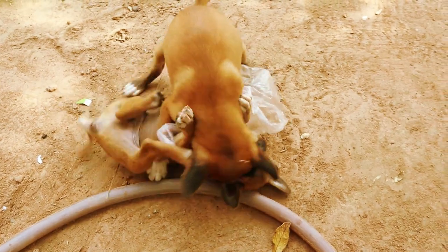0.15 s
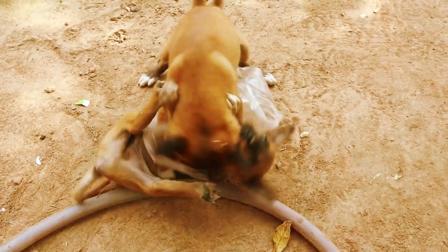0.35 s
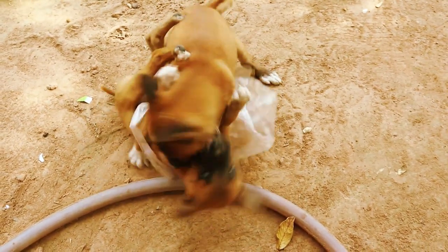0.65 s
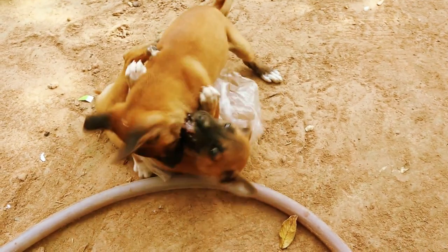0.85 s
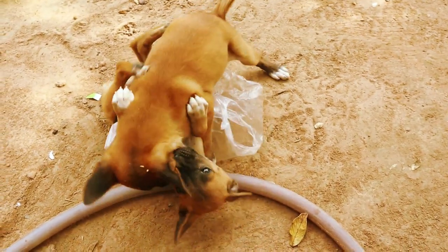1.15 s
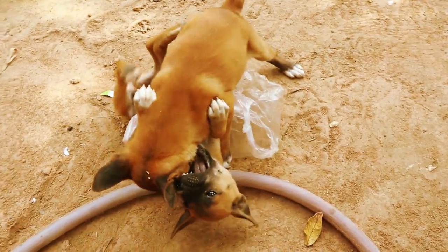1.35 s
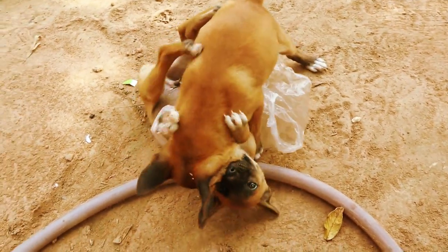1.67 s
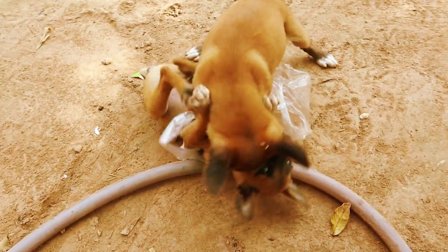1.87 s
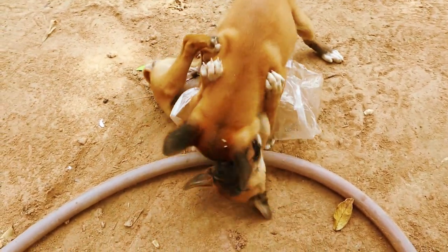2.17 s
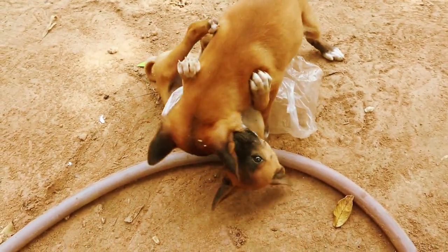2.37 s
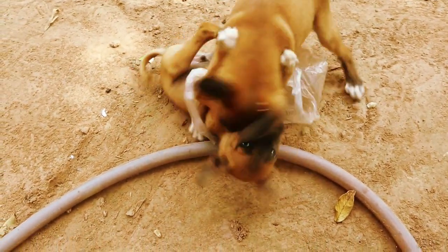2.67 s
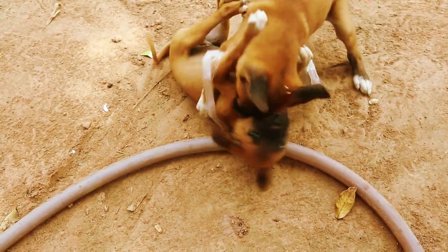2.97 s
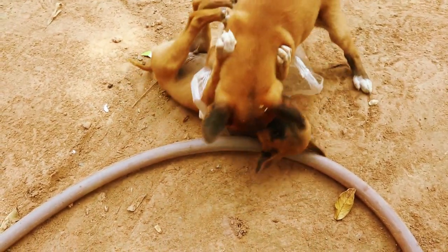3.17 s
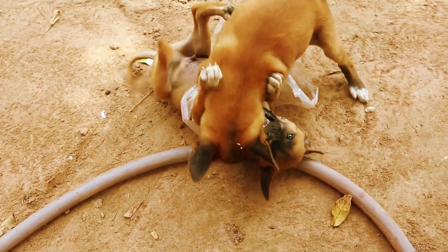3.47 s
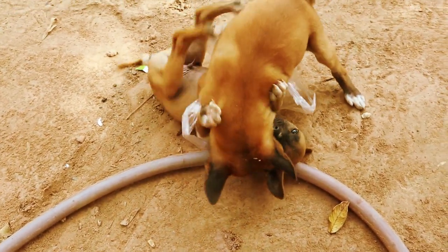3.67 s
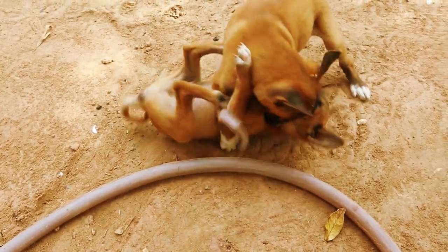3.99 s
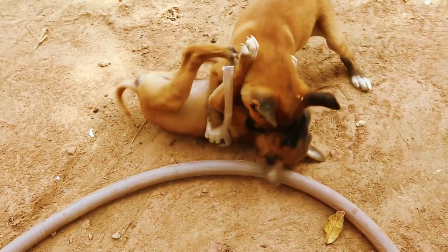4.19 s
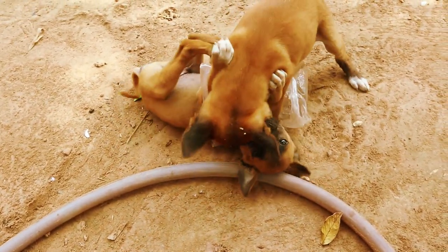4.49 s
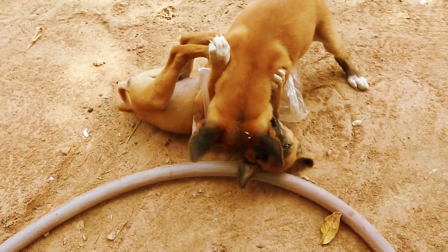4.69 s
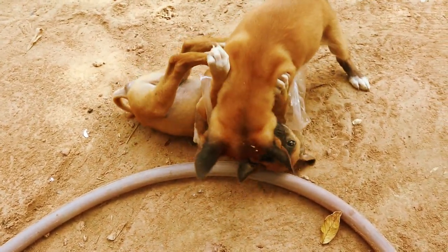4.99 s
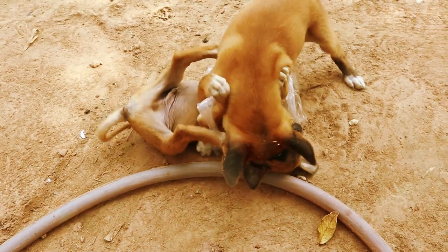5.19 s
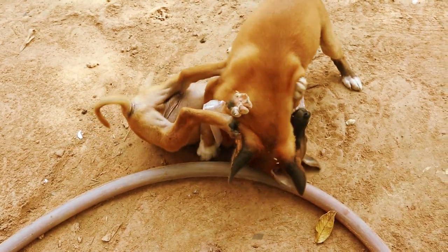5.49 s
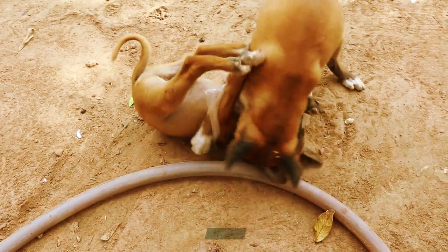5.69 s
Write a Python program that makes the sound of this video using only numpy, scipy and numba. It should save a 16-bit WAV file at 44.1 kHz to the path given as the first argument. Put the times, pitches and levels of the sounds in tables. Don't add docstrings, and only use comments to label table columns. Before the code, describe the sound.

Outdoors on bare dirt, two puppies wrestle at arm's length from a stereo microphone. From 0 to 0.7 s a loud, high-pitched scuffle of snarls and quick yaps bursts out, rough and nasal. Short low growls and a grunt follow around 0.8-1.4 s. From 1.5 s a longer growl flutters, breaking into sharp yelps at about 2.1-2.3 s, then sinking to a low, croaky rattle until 3.4 s. After a small gap, a pulsing growl at 3.7 s stutters rapidly and peaks in a piercing yelp near 4.3 s. More growling with small yelps runs 4.6-5.1 s; a final excited snarl starts at 5.4 s and continues to the end. Beneath, paws scuff grit and thin plastic crackles and ticks. Faint chicks peep intermittently, a distant horn sounds at 1.2-1.5 s with fainter tones later, over soft village rumble, low engine hum and slight wind.

```python
import sys
import numpy as np
from scipy import signal
from scipy.fft import rfft, irfft
from scipy.io import wavfile
from scipy.ndimage import uniform_filter1d
from numba import njit

SR = 44100
rng = np.random.default_rng(int(sys.argv[2]) if len(sys.argv) > 2 else 0)


def volts(x):
    e = np.asarray(x, float) / 20
    return 10 ** e


def store_pcm(level_fs):
    pcm = np.round(np.clip(level_fs, -1, 1) * 32767).astype(np.int16)
    wavfile.write(sys.argv[1], SR, np.atleast_2d(pcm).T)


N = 257984

# t/s, chest level/dB, pulse rate f/Hz, roughness/1
PUSHES = [(0, -22, 227.8, 0.63), (0.212, -13.5, 313.6, .3), (0.298, -21, 265, 0.4), (0.44, -16, 224.8, .4),
          (0.51, -25.5, 258.9, .3), (0.571, -21.5, 317.3, 0.25), (0.67, -20.5, 259.9, .35),
          (0.801, -31, 131.5, .6), (0.922, -26.5, 146.4, .6), (1.028, -30, 147.7, 0.5),
          (1.198, -23.5, 273.9, .5), (1.301, -28, 259.8, 0.4), (1.437, -23.5, 141, .5),
          (1.62, -24, 192.3, 0.8), (1.968, -26.5, 186.8, 0.5), (2.069, -18, 184.5, .15),
          (2.116, -24, 220.9, 0.2), (2.199, -29, 262.8, 0.4), (2.299, -30, 245.7, 0.25),
          (2.387, -36, 229, .1), (2.459, -33, 149.8, .6), (2.62, -31.5, 132.2, .3),
          (2.888, -30, 169.4, .45), (3.039, -38.5, 257.5, 0.1), (3.125, -27.5, 206.9, 0.5),
          (3.27, -28, 180, 0.7), (3.35, -30, 150.2, 0.7), (3.601, -27, 213.2, .4),
          (3.743, -21.5, 238.9, .4), (4.04, -23, 193.3, 0.5), (4.252, -22, 208.9, 0.2),
          (4.309, -22.5, 257, 0.4), (4.38, -25.5, 278.5, .15), (4.417, -37, 182.2, .08),
          (4.519, -34, 139.6, .6), (4.711, -29, 269.3, .5), (4.901, -27.5, 275.3, 0.3),
          (4.972, -29.5, 245.4, .35), (5.052, -28, 210.9, 0.4), (5.298, -29, 101.5, .15),
          (5.509, -25.5, 251.2, 0.3), (5.551, -22, 285.9, 0.2), (5.59, -25, 238.4, 0.3),
          (5.651, -25.5, 257.9, 0.3), (5.7, -23.5, 231.5, 0.3), (5.76, -27, 209.2, .3),
          (5.81, -17, 241.4, 0.3)]
# start t/s, end t/s
BREATHS = [
    (0, .738),
    (.835, 1.022),
    (1.037, 1.078),
    (1.1, 1.378),
    (1.483, 2.452),
    (2.477, 3.375),
    (3.66, 4.45),
    (4.585, 5.12),
    (5.41, 6.2),
]
# t/s, depth of catch level/dB
CATCHES = [(.154, 0), (.245, 7), (.327, 7.5), (0.588, 10), (.93, -2.5), (1.135, 3), (1.198, 9),
           (1.326, -2.5), (1.732, -5.5), (2.005, 11.5), (2.039, 9.5), (2.09, 7.5), (2.122, 1),
           (2.192, -0.5), (2.211, 0), (2.323, 0.5), (2.68, 1.5), (2.74, 5), (2.95, 2), (2.989, 7),
           (3.025, 7), (3.247, 1), (3.34, -7), (4.258, -4.5), (4.278, 4.5), (4.315, -6.5), (4.356, 11),
           (4.698, 5), (4.794, 1), (4.91, -2), (5.435, 5.5), (5.501, -2), (5.562, -6), (5.643, 5.5)]
# first t/s, last t/s, gap t/s, depth level/dB
FLUTTERS = [
    (1.513, 1.63, .037, 1.5),
    (3.691, 4.0, .0416, 12.5),
]
# f/Hz, width f/Hz, level over the bare pulse/dB
CHEST_MODES = [(265, 330, 5), (523, 61, 8.5), (698, 79, 17)]
# f/Hz, width f/Hz, level/dB
UPPER_MODES = [(2770, 200, -17), (3750, 200, -13), (4500, 360, -23.5)]
# start t/s, end t/s, mouth level/dB, first mouth resonance f/Hz, last f/Hz
YELPS = [(0, 0.074, -20, 1630, 1473), (0.084, 0.225, -28, 1301, 1116), (0.237, 0.296, -22.5, 1262, 1445),
         (0.33, 0.442, -29, 1414, 1042), (0.463, 0.558, -16.5, 1087, 1595), (0.568, 0.603, -20, 1626, 1710),
         (0.679, 0.727, -35, 1123, 1624), (0.851, 0.961, -41, 1306, 1290),
         (1.047, 1.057, -20.5, 1794, 1630), (1.053, 1.077, -30, 1342, 1335), (1.14, 1.144, -19, 1260, 1300),
         (1.49, 1.636, -35.5, 1270, 1400), (1.615, 1.854, -36, 1520, 1370), (1.876, 1.917, -44, 1360, 1195),
         (2.099, 2.103, -8.5, 1170, 1170), (2.12, 2.141, -9.5, 1200, 1346),
         (2.135, 2.296, -12.5, 1470, 1651), (2.314, 2.382, -20.5, 1600, 1654),
         (2.48, 2.906, -42.5, 1400, 1200), (2.901, 2.928, -20, 1115, 1239), (2.938, 3.04, -19, 1268, 1488),
         (3.176, 3.386, -52, 1227, 1523), (3.7, 4.026, -42, 1114, 1260), (4.123, 4.26, -55, 1500, 1400),
         (4.254, 4.334, -15, 1220, 1663), (4.331, 4.356, -2.5, 1550, 1707),
         (4.359, 4.429, -16.5, 1560, 1646), (4.746, 4.875, -24.5, 1406, 1625),
         (4.85, 4.901, -19.5, 1490, 1587), (4.908, 4.941, -14, 1650, 1660), (4.964, 4.986, -23, 1654, 1657),
         (5.056, 5.097, -51.5, 1580, 1576), (5.432, 5.493, -48, 1477, 1490), (5.51, 5.621, -16, 1520, 1762),
         (5.58, 5.726, -21, 1595, 1540), (5.748, 5.976, -29.5, 1400, 1314)]
# start t/s, end t/s, level/dB
RASPS = [(0, .04, -27.5), (.715, .745, -21), (1.037, 1.072, -33.5), (1.135, 1.162, -45),
         (1.355, 1.39, -34.5), (2.68, 2.72, -44.5), (3.17, 3.2, -41.5), (3.31, 3.41, -47),
         (3.43, 3.57, -51), (2.215, 2.29, -22.5), (4.91, 4.96, -28), (5.55, 5.6, -33), (4.08, 4.2, -57.5),
         (5.125, 5.14, -46.5)]
# start t/s, end t/s, level/dB
SCUFFS = [(0, .03, -48.5), (.1, .3, -59), (.35, .54, -52.5), (.69, .73, -48.5), (.785, .81, -51.5),
          (.91, 1.12, -55), (1.2, 1.3, -62), (1.345, 1.42, -58), (1.5, 1.56, -66.5), (1.6, 1.87, -63.5),
          (1.878, 1.93, -54.5), (1.95, 2.07, -55), (2.088, 2.13, -53), (2.56, 2.88, -66.5),
          (2.9, 3.08, -57), (3.1, 3.15, -65.5), (3.29, 3.38, -60.5), (3.45, 3.6, -67.5), (3.62, 3.66, -66),
          (3.748, 3.77, -53.5), (3.79, 3.93, -58.5), (3.94, 4.14, -53), (4.16, 4.35, -55.5),
          (4.72, 4.98, -64.5), (5.135, 5.195, -64.5), (5.36, 5.47, -69), (5.5, 5.75, -55.5),
          (5.77, 5.9, -55.5)]
# f/Hz, level per Hz/dB
RUSTLE_COLOUR = [(200, -19), (700, 8.5), (2000, -2), (3500, -0.5), (5000, -7), (7500, -15.5),
                 (11000, -24.5), (15500, -36.5)]
# t/s, peak level/dB
SNAPS = [(0.1007, -43.5), (0.2151, -32.5), (1.2057, -35.5), (1.521, -44.5), (1.8826, -33), (1.9989, -38),
         (2.0896, -25.5), (2.2248, -34), (2.3196, -43), (2.3673, -39), (2.5546, -53), (2.697, -56),
         (2.909, -32.5), (3.3009, -49), (3.6262, -40), (3.7483, -34.5), (4.6593, -55.5), (4.811, -35),
         (4.8793, -34.5), (4.9083, -30.5), (5.1292, -59), (5.3717, -60.5), (5.4715, -53.5), (5.502, -31.5),
         (5.643, -43)]
# t/s, first f/Hz, top f/Hz, last f/Hz, level/dB
PEEPS = [
    (1.917, 4000, 5700, 3900, -54),
    (1.985, 3700, 5100, 4400, -45),
    (3.005, 3900, 4800, 5200, -49),
    (3.615, 4700, 6200, 6600, -61),
    (3.685, 1900, 2550, 2500, -46),
    (4.643, 3800, 6200, 5200, -64),
    (4.69, 3900, 3950, 3900, -56),
    (.13, 4500, 4400, 4300, -49),
    (1.045, 3700, 4900, 4900, -51),
    (1.408, 3950, 4000, 3950, -56),
]
# start t/s, end t/s, f/Hz, level/dB
HORN = [
    (1.159, 1.5, 1474, -42),
    (1.139, 1.5, 735, -55),
    (3.424, 3.55, 705, -56),
    (3.544, 3.68, 1156, -56),
    (5.185, 5.3, 685, -59),
]
# f/Hz, level per Hz/dB
VILLAGE = [(60, -45.5), (120, -3), (400, -17), (720, -15.5), (1000, -14.5), (2000, -21), (3800, -29),
           (8000, -73)]
# start t/s, end t/s, level/dB
GUSTS = [
    (3.58, 3.7, -44.5),
    (3.8, 4.3, -57.5),
    (4.85, 4.95, -56.5),
]
# f/Hz, phase/rad
PORT_PHASE = [(40, 0.99), (430, -0.77), (1210, -0.81), (2150, -0.69), (2930, -0.73), (3530, 0.44)]
# f/Hz, level/dB
PORT_BALANCE = [(60, -2.5), (94, -2), (150, 5), (230, 2.5), (360, 2.5), (560, 1), (880, 2), (1370, 1),
                (2150, 0.5), (3360, 5)]

PITCH_GLIDE_S, LEVEL_GLIDE_S, PITCH_WANDER = .04, .04, .04
BREATH_RISE_S, BREATH_FALL_S, BREATH_ARCH_DB = .008, .018, 3.5
JAW_RISE_S, JAW_FALL_S, JAW_ARCH_DB = 0.02, 0.036, 5
GAPE_EARLY_AT, GAPE_EARLY_SHARE = 0.51, 0.64
SHUT_MOUTH_DB, SHUT_UPPER_DB = -15.5, -26.5
CHEEK_DB, PALATE_DB, PALATE_ABOVE_HZ = -14, -19.5, 916
UPPER_DB, UPPER_DB_PER_OCTAVE, REST_HZ = -19.5, -1, 1400
THROAT_CUT_HZ = 3950
TEETH_HZ, TEETH_WIDTH_HZ, TEETH_DB, TEETH_CUT_HZ = 6900, 1800, -20, 11000
PEAK_AT = 0.36
SCUFF_RISE_S, SCUFF_FALL_S, STIRRING_DB = .05, .2, -68
PEEP_S = .045
VILLAGE_LEVEL_DB, ENGINE_DB, BREEZE_DB = -44, -47.5, -59.5
DUCK_ABOVE_DB, DUCK_RATIO, DUCK_RECOVER_DB_S = -15, 2.3, 3


def puppies():
    start, end, db, first_hz, last_hz = np.transpose(YELPS)
    early_s = start + GAPE_EARLY_AT * (end - start)
    early_hz = first_hz + GAPE_EARLY_SHARE * (last_hz - first_hz)
    gape_s = np.ravel([start, early_s, end], "F")
    gape_hz = np.ravel([first_hz, early_hz, last_hz], "F")
    mouth_hz = np.interp(np.arange(N) / SR, gape_s, gape_hz)

    clicks, airy = flutter() * np.array(glottis())
    chest = chest_sound(.7 * clicks + .3 * airy)
    mouth, palate = mouth_sound(airy, mouth_hz)
    upper = upper_throat(airy, mouth_hz)

    breaths = [(a, b, 0) for a, b in BREATHS]
    breath_db = spans_db(breaths, BREATH_RISE_S, BREATH_FALL_S, BREATH_ARCH_DB)
    chest_db = pushes(column=1, glide_s=LEVEL_GLIDE_S) + breath_db
    open_db = spans_db(zip(start, end, db), JAW_RISE_S, JAW_FALL_S, JAW_ARCH_DB)
    gape_rasp_db = open_db + UPPER_DB + UPPER_DB_PER_OCTAVE * np.log2(mouth_hz / REST_HZ)
    rasp_db = np.maximum(gape_rasp_db, spans_db(RASPS, rise_s=0.011, fall_s=0.012, arch_db=0.5))

    growl = volts(chest_db) * (chest + volts(SHUT_MOUTH_DB) * mouth + volts(SHUT_UPPER_DB) * upper)
    yelp = volts(open_db) * (mouth - palate)
    return growl + yelp + volts(rasp_db) * upper


def glottis(jitter=.35, shimmer_db=4.5, breath=.12):
    pitch = pushes(column=2, glide_s=PITCH_GLIDE_S) * np.exp(PITCH_WANDER * drift(6))
    rough = pushes(column=3, glide_s=LEVEL_GLIDE_S)
    restarts_s = np.append(reopenings()[:, 0], np.array(BREATHS)[:, 0])
    reopen = np.append(np.sort(restarts_s) * SR, 2 * N).astype(int)
    clicks, i = np.zeros(N), 0
    for step, strength in rng.standard_normal((3000, 2)):
        period = int(SR / pitch[i] * np.exp(jitter * rough[i] * step))
        restart = reopen[np.searchsorted(reopen, i, side="right")]
        i = restart if restart < i + 1.5 * period else i + period
        if i >= N:
            break
        click_db = shimmer_db * (.15 + rough[i]) * np.clip(strength, -2, 1.5)
        clicks[i] = volts(click_db) / np.sqrt(pitch[i])
    puff = signal.lfilter([1], [1, -np.exp(-1 / (.0025 * SR))], clicks)
    air = breath * (.14 + 1.15 * rough) * puff * rng.standard_normal(N)
    return clicks, clicks + air


def pushes(column, glide_s):
    rows = np.array(PUSHES)
    now = np.searchsorted(rows[1:, 0], np.arange(N) / SR, side="right")
    return uniform_filter1d(rows[now, column], size=int(glide_s * SR), mode="nearest")


def reopenings():
    runs = [(s, db) for first, last, gap, db in FLUTTERS for s in np.arange(first, last, gap)]
    return np.array(sorted(list(map(tuple, CATCHES)) + runs))


def flutter(shut_s=0.0067, before_s=.012):
    t, dip_db = np.arange(N) / SR, np.zeros(N)
    for s, depth_db in reopenings():
        near = slice(max(int((s - .04) * SR), 0), int((s + .02) * SR))
        dip_db[near] -= depth_db * np.exp(-((t[near] - s + before_s) / shut_s) ** 2)
    return volts(dip_db + 3)


def chest_sound(clicks, open_s=0.0022):
    push = signal.lfilter(np.hanning(int(open_s * SR)), [1], clicks)
    rung = push
    for hz, width_hz, db in CHEST_MODES:
        rung = rung + volts(db) * resonance(push, hz * np.exp(0.09 * drift(5)), width_hz)
    return rms_one(signal.sosfilt(signal.butter(3, 92, "high", fs=SR, output="sos"), rung))


def mouth_sound(airy, mouth_hz):
    mouth = resonance(resonance(resonance(airy, mouth_hz, 310), mouth_hz, 560), mouth_hz, 900)
    cheek = resonance(resonance(airy, mouth_hz * 0.75, 410), mouth_hz * 0.59, 420)
    palate_hz = mouth_hz + PALATE_ABOVE_HZ * np.exp(.12 * drift(4))
    palate = rms_one(resonance(resonance(airy, palate_hz, 350), palate_hz, 660))
    return rms_one(mouth - volts(CHEEK_DB) * cheek), volts(PALATE_DB) * palate


def upper_throat(airy, mouth_hz):
    second = resonance(resonance(airy, mouth_hz * 1.16, 560), mouth_hz * 1.77, 1000)
    throat_cut = signal.butter(6, THROAT_CUT_HZ, fs=SR, output="sos")
    throat = signal.sosfilt(throat_cut, second - cavity(airy, UPPER_MODES))
    teeth_cut = signal.butter(4, TEETH_CUT_HZ, fs=SR, output="sos")
    teeth = signal.sosfilt(teeth_cut, cavity(airy, [(TEETH_HZ, TEETH_WIDTH_HZ, 0)]))
    return rms_one(throat) + volts(TEETH_DB + 3.0 * drift(18)) * rms_one(teeth)


def cavity(x, modes):
    out = 0
    for k, (hz, width_hz, db) in enumerate(modes):
        out = out + (-1) ** k * volts(db) * resonance(resonance(x, hz, width_hz), hz, 2 * width_hz)
    return out


def resonance(x, hz, width_hz):
    return resonate(x, np.full(N, 1.) * hz, np.exp(-np.pi * width_hz / SR), float(SR))


@njit
def resonate(x, hz, r, rate):
    y = np.zeros(len(x))
    for i in range(2, len(x)):
        drive = (1 - r * r) / 2 * (x[i] - x[i - 2])
        y[i] = drive + 2 * r * np.cos(2 * np.pi * hz[i] / rate) * y[i - 1] - r * r * y[i - 2]
    return y


def spans_db(rows, rise_s, fall_s, arch_db=0):
    t, out = np.arange(0, N + 32, 32) / SR, -120.
    for start, end, db in rows:
        u = np.clip((t - start) / (end - start), 0, 1)
        edges = (start - t).clip(0) / rise_s + (t - end).clip(0) / fall_s
        off_peak = np.maximum(1 - u / PEAK_AT, (u - PEAK_AT) / (1 - PEAK_AT))
        out = np.maximum(out, db - 30 * edges - arch_db * off_peak ** 2)
    return np.interp(np.arange(N) / SR, t, out)


def drift(rate):
    r = np.exp(-80 * np.pi * rate / SR)
    slow = signal.lfilter([1], [1, -2 * r, r * r], rng.standard_normal(N // 40 + 2002))[2000:]
    return np.interp(np.arange(N) / 40, np.arange(len(slow)), rms_one(slow))


def rms_one(x):
    return x / np.sqrt(np.mean(x ** 2) + 1e-20)


def rustle(duck_db, per_s=900, snap_db=3.0, patchy_db=3.5):
    happens = rng.random(N) < per_s * volts(5 * drift(25)) / SR
    crackle = happens * volts(snap_db * np.minimum(rng.exponential(1, N), 5))
    shared = rms_one(crackle * rng.choice([-1, 1], N)) + 0.5 * rng.standard_normal(N)
    rest = coloured(shared + 2.47 * rng.standard_normal((2, N)), RUSTLE_COLOUR)
    grains = 0
    for edge_hz in (2500, 5000, 8500, 20000):
        low = signal.sosfiltfilt(signal.butter(2, edge_hz, fs=SR, output="sos"), rest)
        rest = rest - low
        grains = grains + volts(patchy_db * drift(12.3)) * low
    scuff_db = np.maximum(spans_db(SCUFFS, SCUFF_RISE_S, SCUFF_FALL_S), STIRRING_DB + duck_db)
    return volts(scuff_db + 16.5 + 2.25 * drift(36)) * grains


def snaps(decay_s=.0025):
    clicks = np.zeros(N)
    s, db = np.transpose(SNAPS)
    clicks[(s * SR).astype(int)] = volts(db - 14.0)
    ring = signal.lfilter([1], [1, -np.exp(-1 / (decay_s * SR))], clicks + 1e-18)
    tick = ring * rng.standard_normal((2, N))
    return signal.sosfilt(signal.butter(2, [3200, 11000], "band", fs=SR, output="sos"), tick)


def chicks():
    slow = signal.sosfilt(signal.butter(2, 350, fs=SR, output="sos"), rng.standard_normal(N))
    hoarse = 1 + 1.0 * rms_one(slow)
    out = np.zeros(N)
    for start, first_hz, top_hz, last_hz, db in PEEPS:
        u = np.linspace(0, 1, int(PEEP_S * SR))
        bend_hz = 4 * top_hz - first_hz - last_hz
        hz = first_hz * (1 - u) ** 2 + last_hz * u ** 2 + bend_hz * u * (1 - u)
        swell = np.sqrt(np.sin(np.pi * u).clip(0))
        i = int(start * SR)
        out[i:i + len(u)] += volts(db + 3.5) * swell * np.sin(2 * np.pi * np.cumsum(hz) / SR)
    return out * hoarse


def horn():
    t, out = np.arange(N) / SR, 0
    for start, end, hz, db in HORN:
        held = np.clip(np.minimum(t - start, end - t) / 0.017, 0, 1)
        out = out + volts(db + 4.5 + 1.7 * drift(12.0)) * held * np.sin(2 * np.pi * hz * t)
    return out


def village(duck_db):
    high = signal.butter(2, 350, "high", fs=SR, output="sos")
    apart = signal.sosfilt(high, rng.standard_normal((2, N)))
    noise = rng.standard_normal(N) + 0.23 * apart
    far = volts(VILLAGE_LEVEL_DB + 1.3 * duck_db + drift(30)) * coloured(noise, VILLAGE)

    engine_hz = 52 + 1.9 * drift(6.1)
    hum = volts(-1.0 + 2.0 * drift(4.1)) * np.sin(2 * np.pi * np.cumsum(engine_hz) / SR)

    wind_band = signal.butter(3, [18, 42], "band", fs=SR, output="sos")
    wind = rms_one(signal.sosfilt(wind_band, rng.standard_normal(N)))
    wind_level = volts(BREEZE_DB + duck_db) + volts(spans_db(GUSTS, rise_s=0.17, fall_s=.45))
    return far + volts(ENGINE_DB + duck_db) * hum + wind_level * wind


def coloured(x, spectrum):
    hz = np.fft.rfftfreq(N, 1 / SR)
    return rms_one(irfft(rfft(x) * volts(at_hz(spectrum, hz)), N))


def at_hz(points, hz):
    hz_points, values = np.transpose(points)
    return np.interp(np.log(hz + 1), np.log(hz_points + 1), values)


def ducking(loud):
    level_db = 10 * np.log10(uniform_filter1d(loud ** 2, size=4000) + 1e-12)
    back = DUCK_RECOVER_DB_S * np.arange(N) / SR
    over = np.maximum.accumulate(DUCK_RATIO * (level_db - DUCK_ABOVE_DB).clip(0) + back) - back
    return -uniform_filter1d(over, size=2000)


def ports(x):
    hz = np.fft.rfftfreq(N, 1 / SR)
    half = volts(at_hz(PORT_BALANCE, hz) / 2) * np.exp(.5j * at_hz(PORT_PHASE, hz))
    pair = irfft(rfft(x) * np.array([half, 1 / half]), N)
    left_echo = np.roll(x, 130) - 0.63 * np.roll(x, 610)
    right_echo = np.roll(x, 171) + 0.79 * np.roll(x, 533)
    high = signal.butter(1, 1500, "high", fs=SR, output="sos")
    echoes = signal.sosfilt(high, np.array([left_echo, right_echo]))
    return pair * volts(np.array([[-.4], [.4]])) + volts(-19) * echoes


def scene():
    voices = puppies()
    duck_db = ducking(voices)
    return ports(voices + chicks() + horn()) + rustle(duck_db) + snaps() + village(duck_db)


def roll_off(x):
    return signal.sosfilt(signal.butter(12, 15400, fs=SR, output="sos"), x)


def record(dry):
    mix = .95 * np.tanh(dry / .95)
    return roll_off(mix)


dry = scene()
out = record(dry)
store_pcm(out)
```